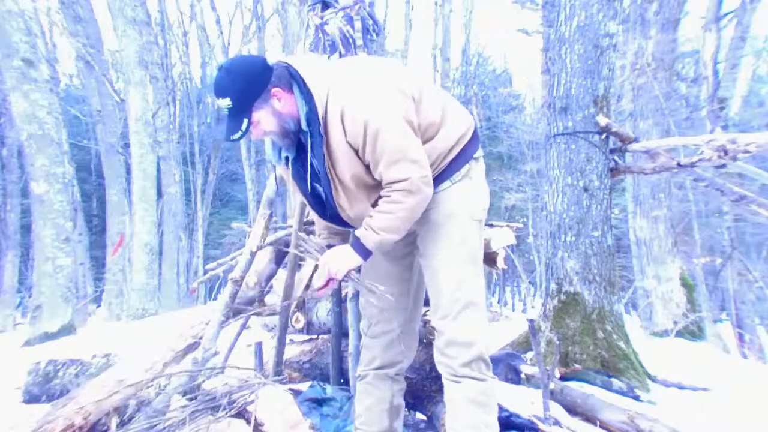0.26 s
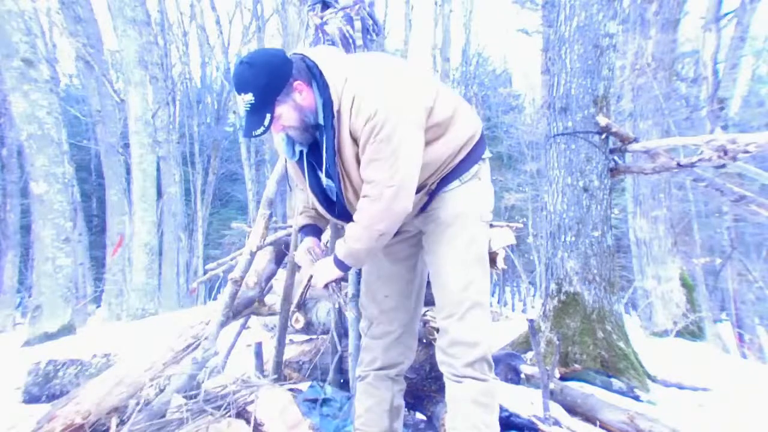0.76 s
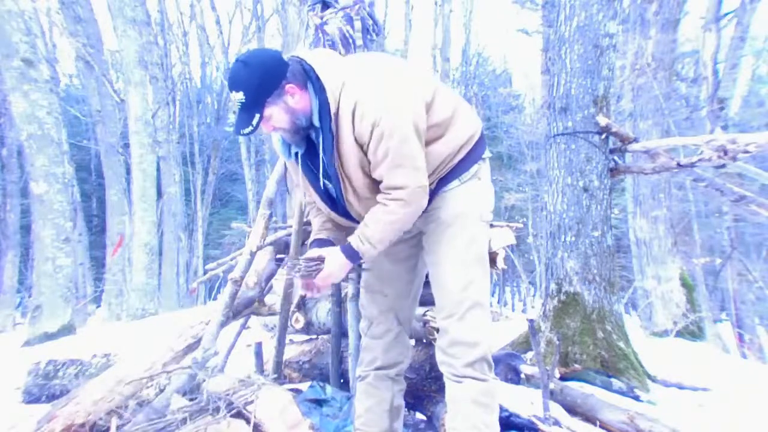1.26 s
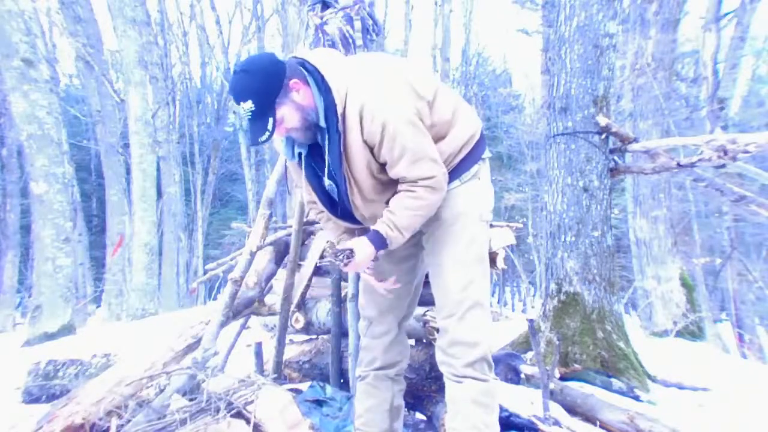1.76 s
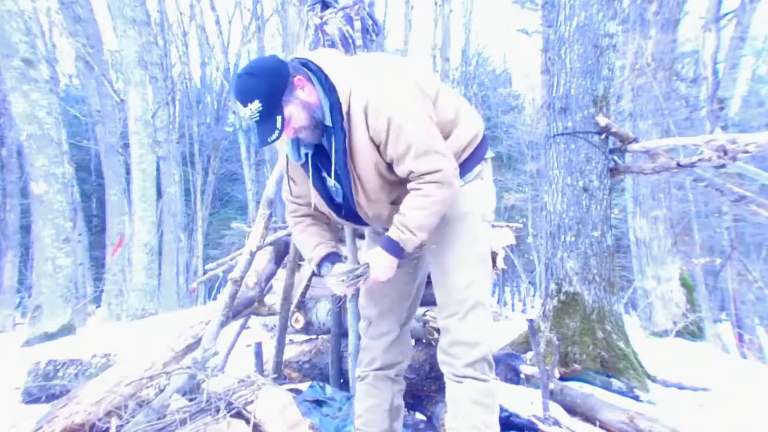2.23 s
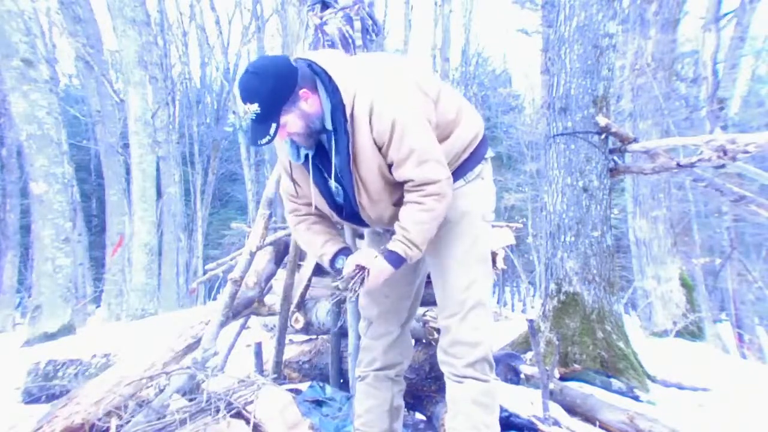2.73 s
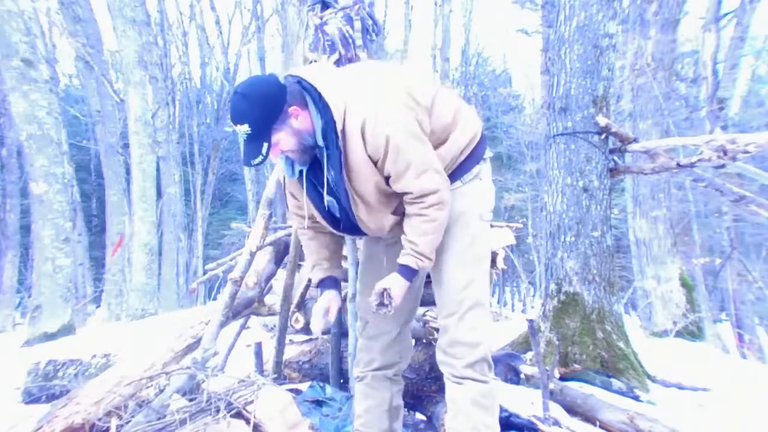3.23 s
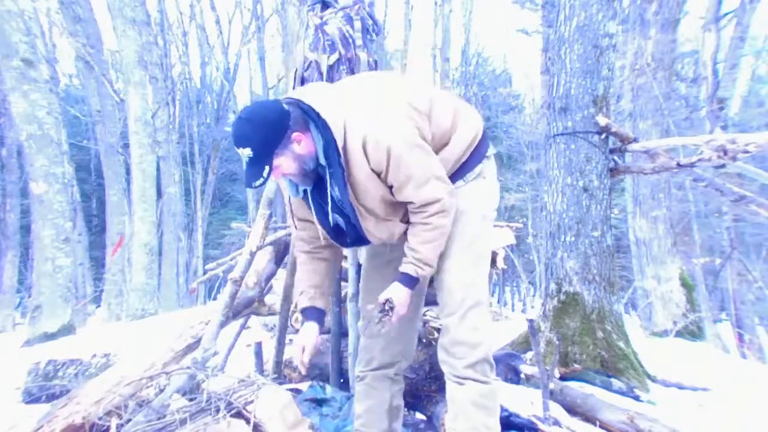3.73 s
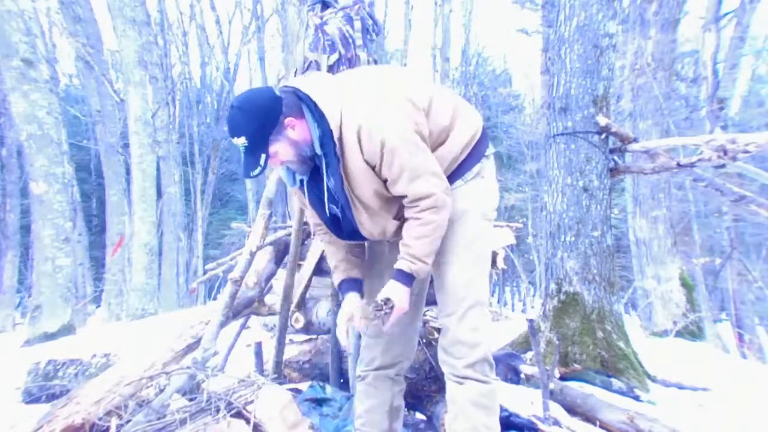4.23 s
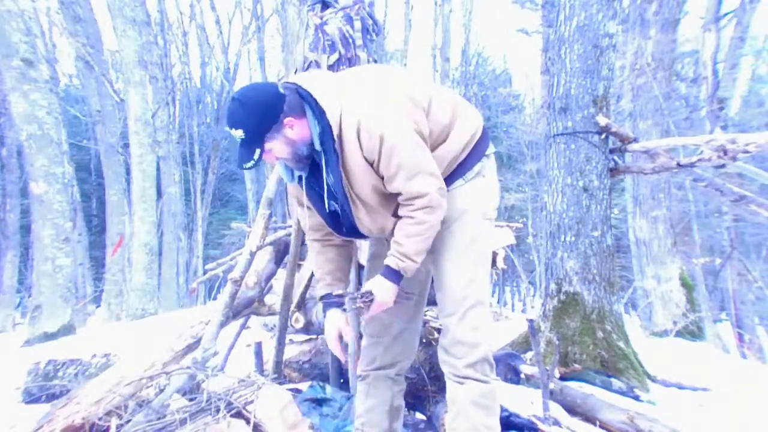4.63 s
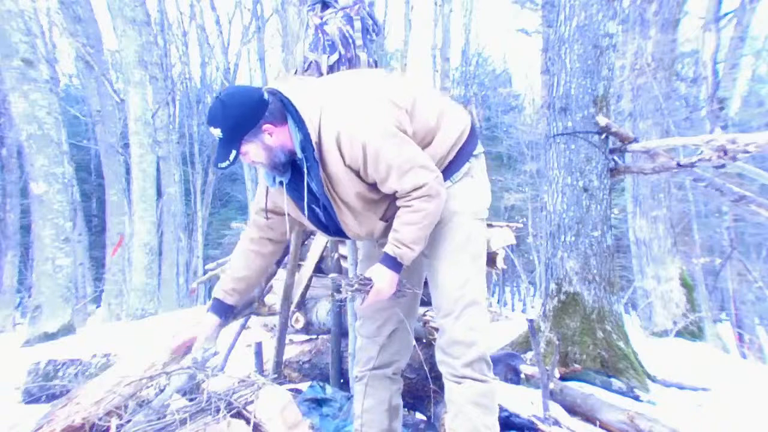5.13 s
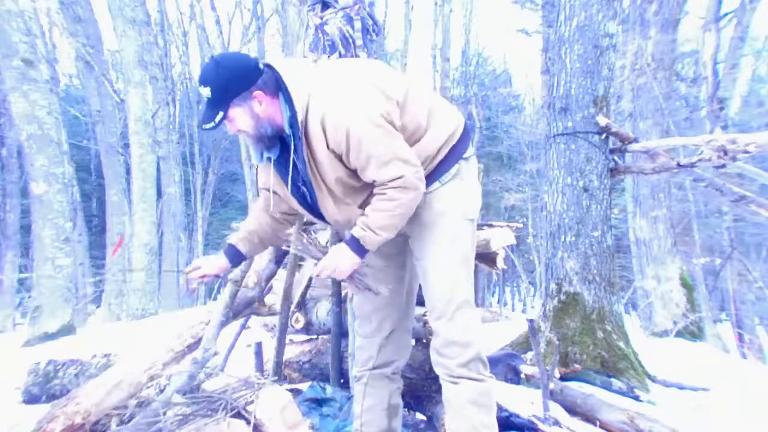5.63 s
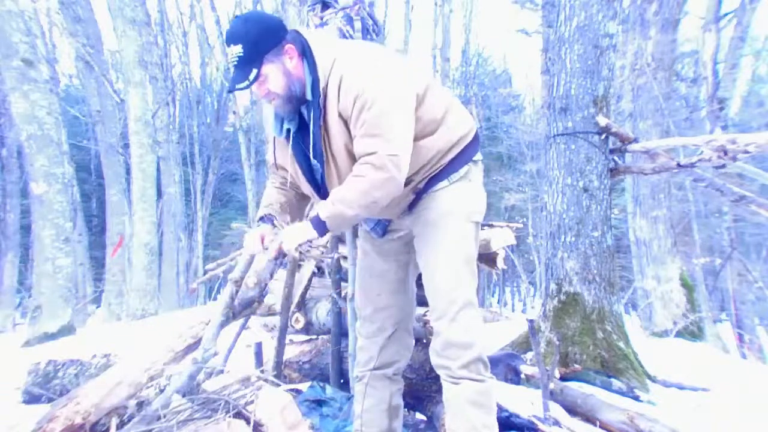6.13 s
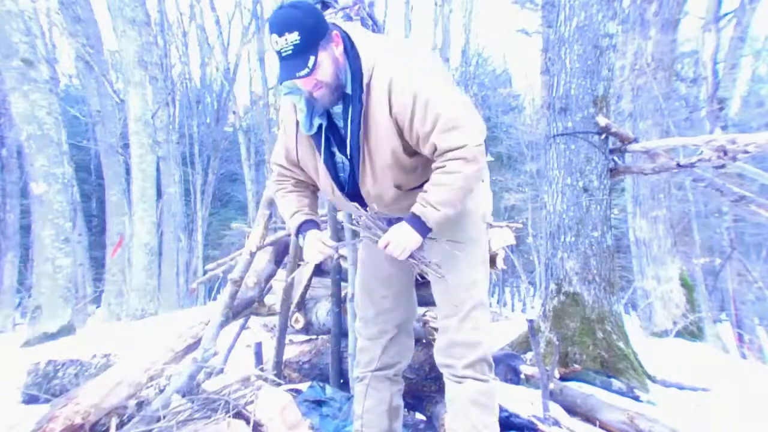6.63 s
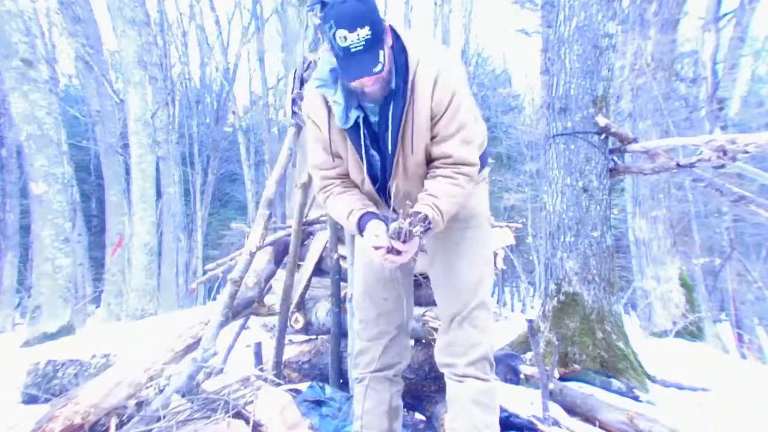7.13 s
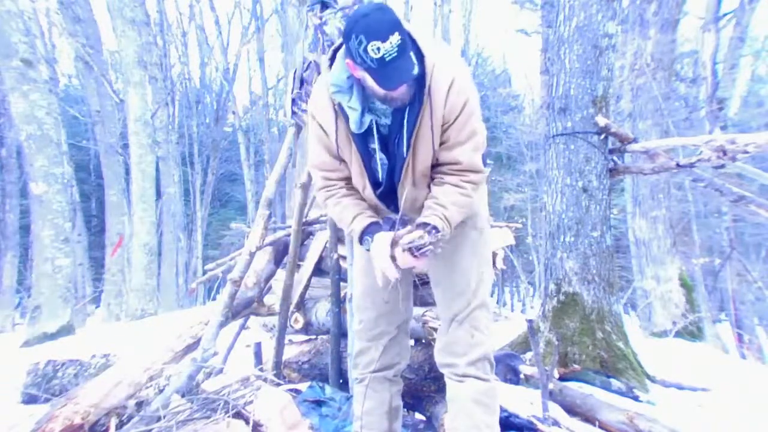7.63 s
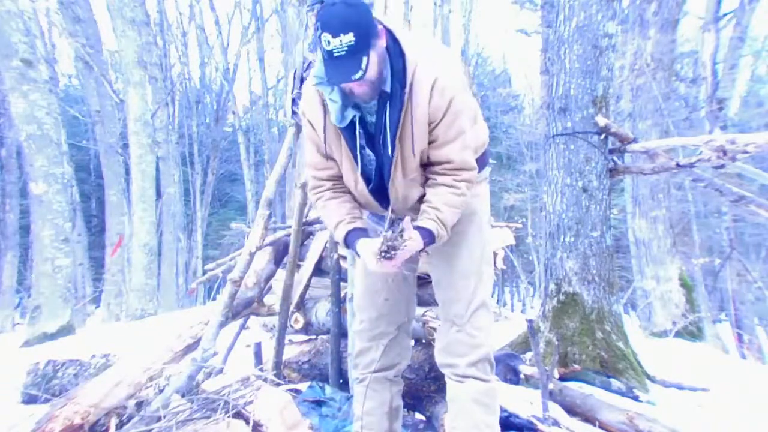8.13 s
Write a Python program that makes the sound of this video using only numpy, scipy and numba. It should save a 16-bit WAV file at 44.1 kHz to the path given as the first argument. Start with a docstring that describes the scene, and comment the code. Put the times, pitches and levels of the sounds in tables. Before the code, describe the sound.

A thin stick cracks at once amid brisk, dry rustling, then small twigs scrape and tick. Around 1.0 to 1.2 s a tight cluster of loud, brittle snaps breaks out, with splintering tails; lighter ticks follow, and a second, denser volley comes at 2.0 to 2.3 s. Rustling and small cracks thin out until 3 s. From 3 to 5.3 s it is nearly still, only faint knocks and ticks over soft air, hiss and a very high thin whine. Scraping returns about 5.3 s, and from 6.5 to 6.8 s rapid snaps peak in the hardest crack, overloading slightly so the level dips briefly. The bundle keeps rustling with fuller, woodier clicks, a strong snap at 7.9 s, and a swelling crunchy rustle at the end, 8.3 s. Bright, dry outdoor sound with a short diffuse scatter from trees, left channel only, right silent.

```python
"""Thin dry sticks are snapped and gathered by hand in a still, snowy wood, a few metres from a camera.
Breaks are bursts of tiny fibre cracks that ring, knock and splinter; twigs scrape and tick in the bundle.
Trunks and ground scatter the sticks back over a faint wash of air, amplifier hiss and a high whine.
The one microphone peaks near 7 kHz and feeds the left track only; it overloads, and its gain control ducks."""
import sys
import numpy as np
from scipy import signal
from scipy.fft import rfft, irfft
from scipy.io import wavfile
from scipy.ndimage import uniform_filter1d
from numba import njit

SR = 44100
rng = np.random.default_rng(int(sys.argv[2]) if len(sys.argv) > 2 else 0)


def log_audio(samples):
    """Write samples as a 16-bit WAV file to the path given in sys.argv[1]."""
    # one column per channel
    frames = np.atleast_2d(samples).T
    # limit to full scale, then quantise
    limited = np.clip(frames, -1, 1)
    pcm = np.round(limited * 32767).astype(np.int16)
    wavfile.write(sys.argv[1], SR, pcm)


N = 369237  # samples

# All levels are ahead of the input gain; all but the hiss and whine are also ahead of the microphone. # How
# hard the hands work the bundle: # (time [s], rustle level [dB], thick sticks over twigs [dB], fine twigs over
# twigs [dB])
HANDLING = [(0, -33.5, -7, -3), (.05, -39.5, -16, -13), (.29, -40, -16, -20), (.33, -43.5, -16, -11),
            (.39, -40.5, -13, -9), (.45, -49, -9.5, -9), (.52, -41.5, -14, -6), (.57, -52, -8, -13),
            (.65, -38, -10.5, -11), (.86, -41, -11.5, -6), (1.03, -43.5, -11, -3.5), (1.3, -42.5, -4, -10),
            (1.37, -48, -3.5, -9), (1.44, -43, -8, -8), (1.52, -50.5, -4, -10), (1.69, -46, -5, -5),
            (1.79, -38, -8, -8), (1.84, -55.5, -3.5, -7), (2.0, -43.5, -7.5, -5), (2.4, -50.5, -10, -10),
            (2.45, -43, -11, -6), (2.62, -41, -6, -7), (2.71, -52, -6.5, -3), (2.86, -42.5, -15, -7.5),
            (2.92, -57.5, -13, -6), (3.2, -55.5, -4, -3), (3.26, -61.5, -5, -4), (3.55, -56.5, -3, -7),
            (3.64, -47.5, -8.5, -10), (3.71, -63, 1, -4), (3.8, -55, -11, -13), (3.93, -62, -2, -8),
            (3.97, -49, -3.5, -6), (4.15, -47, -11, -8), (4.22, -64, -1.5, -11), (4.42, -54.5, 2.5, -16),
            (4.5, -63.5, 0, -5), (5.3, -64, -3, -8), (5.33, -44, -10, -13), (5.51, -42, -13.5, -12),
            (5.61, -37.5, -15.5, -12), (5.68, -51.5, -6, -11), (5.88, -52, -9, -14), (6.0, -44, -7.5, -26),
            (6.11, -51, -10, -20), (6.14, -40, -11.5, -9.5), (6.43, -50.5, -5, -10), (6.52, -33, -7, -7),
            (6.61, -45, -8, -6), (6.69, -39.5, -9, -3.5), (6.77, -45.5, -8.5, -14),
            (6.83, -37.5, -8.5, -5.5), (7.0, -44, -5.5, -2.5), (7.07, -38.5, -4, -5.5),
            (7.37, -45, -2.5, -8), (7.44, -49.5, -2.5, -8), (7.59, -45.5, -3, -9.5),
            (7.84, -45.5, -0.5, -5), (7.93, -38, -0.5, -3.5), (8.0, -54, -5.5, -9), (8.15, -38, -1.5, -5),
            (8.26, -50, -1, -5), (8.37, -24, -7, -5)]
# Short rings of the twigs in the bundle:
# (centre [Hz], width of the first of two filters [Hz], level [dB], kind [0 thick stick, 1 twig, 2 fine twig])
TWIG_RINGS = [(1210, 940, -8, 0), (1976, 1100, -9, 0), (2840, 1260, -5.5, 0), (3460, 1900, -9.5, 1),
              (5030, 1300, -11, 1), (5910, 1040, -8.5, 1), (6600, 910, -11.5, 1), (7910, 1470, -11, 1),
              (9150, 1650, -6, 2), (10400, 3100, -2.5, 2), (14800, 3800, -6, 2)]
# Breaks and clear ticks:
# (time [s], crack level [dB], crack T60 [s], knock [Hz], knock over crack [dB], treble over crack [dB])
BREAKS = [(0.012, -20, 0.032, 3330, -13, -19), (.0649, -30.5, 0.02, 2920, -1, -20),
          (.0753, -27.5, 0.022, 3100, -8, -20), (.1347, -38, .014, 2510, -30, -15),
          (0.254, -35.5, 0.12, 2840, -6, -19), (.4789, -36, 0.021, 2820, -21, -10),
          (0.5307, -30.5, 0.022, 1260, -19, 1), (.5632, -42.5, 0.029, 1960, 11.5, -17),
          (0.5833, -37.5, 0.018, 2470, 5.5, -12), (.6137, -28.5, 0.029, 2200, -19, -13),
          (0.646, -32.5, 0.042, 2930, -11, 2), (0.7317, -31.5, 0.021, 2560, -22, -17),
          (0.8166, -24.5, 0.021, 2720, -20, -4), (0.8476, -31, 0.012, 2870, 0, 12.5),
          (0.86, -27, 0.036, 2610, -14, -17), (.878, -39.5, 0.014, 1960, 5, -9),
          (0.95, -34.5, 0.012, 2820, 2, 8), (1.0242, -37, .01, 2180, -18, 9),
          (1.0416, -16, 0.034, 2220, -13, 2), (1.0725, -10.5, 0.05, 2280, -17, 5.5),
          (1.077, -5.5, .018, 3020, -14, -14), (1.1103, -26.5, .015, 1170, -6, -7),
          (1.1604, -11, 0.011, 1880, -11.5, -26), (1.189, -27, 0.015, 1670, -7, -13),
          (1.199, -18, 0.0067, 2040, -13, -10), (1.2155, -38, .012, 2350, 6, -8),
          (1.287, -31.5, 0.015, 3050, -2, -10), (1.4143, -36, 0.038, 3100, -2, -8),
          (1.4403, -23.5, .01, 1740, -16, -33), (1.5644, -28.5, 0.015, 2150, -8, -21),
          (1.612, -18.5, 0.021, 2530, -8, -9), (1.752, -18, 0.013, 2090, -18, -10),
          (1.787, -23.5, .018, 2240, -30, -15), (1.7923, -31, 0.026, 1470, 3.5, -9),
          (1.8154, -36, .022, 1780, -20, -8), (1.857, -29.5, 0.011, 2290, -26, -7),
          (1.9366, -38.5, 0.036, 3160, -9, 8), (1.973, -35, .015, 2120, -12, -3),
          (2.0144, -17.5, 0.016, 2800, -7, 7.5), (2.0206, -17.5, 0.0093, 2540, -19, 2),
          (2.0339, -7, .008, 2230, -20, -27), (2.0453, -10.5, 0.012, 1960, -15, -0.5),
          (2.0984, -7.5, 0.04, 1920, -21, 2.5), (2.147, -6, 0.019, 2480, -12, 4),
          (2.1959, -21, .03, 2380, -13, 6), (2.214, -11, 0.009, 2780, -32, -35),
          (2.223, -13, 0.014, 3000, -35, -17), (2.274, -28.5, .029, 3010, -30, -7),
          (2.4346, -30, 0.017, 2890, -23, -1), (2.4532, -33, 0.016, 3060, -23, 6),
          (2.4826, -29, 0.018, 2860, -13, -15), (2.5203, -28, 0.014, 2560, -26, -11),
          (2.534, -28.5, 0.0059, 2330, -8, -8), (2.6066, -22, 0.0088, 2380, 2, -14),
          (2.6157, -30, .022, 3070, -20, 13), (2.675, -34.5, 0.035, 1330, -12, 2),
          (2.707, -29.5, 0.017, 2280, -17, -22), (2.733, -27, .016, 2190, -23, -19),
          (2.803, -35, 0.015, 2330, -17, -18), (2.8437, -34.5, .02, 2840, -20, -14),
          (2.967, -44, .015, 1590, -4, -3), (3.0246, -33, 0.03, 2210, -18, -22),
          (3.084, -37, 0.029, 2410, -21, -9), (3.0937, -40, 0.038, 2410, -12, 1),
          (3.1527, -33, 0.0071, 1760, -23, -9), (3.213, -42, 0.027, 2610, 6, -14),
          (3.258, -47, .03, 2580, -18, 3), (3.5872, -40.5, 0.037, 1460, -12, -16),
          (3.646, -39, 0.045, 2120, -26, -13), (3.79, -39.5, .027, 2420, -25, -11),
          (3.8185, -31.5, 0.015, 2100, -0.5, -16), (3.8375, -48, .018, 3020, -6, 8),
          (3.953, -42, 0.027, 1340, -12, -8), (3.971, -36.5, 0.03, 2840, 5.5, -6),
          (4.0118, -33.5, .013, 2720, -7, -11), (4.0883, -31, 0.017, 3040, -13, -18),
          (4.1187, -46, 0.013, 2350, 3.5, -11), (4.1448, -40.5, 0.048, 2500, -6, 5),
          (4.2, -35.5, 0.015, 2400, -10, -16), (4.6522, -37.5, 0.025, 1900, 11.5, -2),
          (4.6728, -49.5, 0.041, 2460, 10, -8), (5.383, -38, 0.023, 2730, -27, -4),
          (5.5388, -37, .03, 3180, 0.5, -25), (5.6, -40, .033, 3200, -26, -15),
          (5.7112, -43, .06, 2070, -2.5, 1), (5.7809, -30.5, 0.04, 2130, -20, -17),
          (5.8843, -38, 0.062, 2820, -7, -21), (5.9107, -25, 0.033, 3260, -35, -23),
          (5.948, -32.5, 0.038, 2180, -34, -24), (6.0147, -32, 0.047, 3300, -3, -19),
          (6.0583, -38.5, 0.039, 2920, -4, -20), (6.1271, -32.5, 0.0099, 3080, -1, -22),
          (6.195, -30, .0061, 2730, -11, -21), (6.228, -30.5, 0.025, 1730, -26, -1),
          (6.2843, -35, .0054, 1380, -20, -9), (6.391, -35.5, 0.026, 1590, -0.5, -13),
          (6.4511, -23, 0.013, 2500, -13, 8.5), (6.5097, -29, 0.05, 2880, -7, -13),
          (6.5533, -28, 0.011, 2020, -24, -20), (6.5628, -19, 0.017, 2250, -14, 7),
          (6.578, -30, .023, 2700, -26, -12), (6.5978, -16.5, 0.014, 2980, -17, 5),
          (6.628, -14.5, 0.03, 2650, -12, -8), (6.65, -14, 0.0085, 1670, -12, 8),
          (6.6602, -9, 0.033, 2400, -10, 6.5), (6.6786, -25, .028, 2800, -12, 2),
          (6.6897, -25, 0.0097, 1720, -11, 8), (6.7148, -32.5, 0.043, 1990, -8, -5),
          (6.744, -30, 0.012, 1480, -11, -3), (6.7815, 0, 0.029, 2270, -14, -4),
          (6.7895, -16.5, 0.016, 3450, 1, -7), (6.8452, -21, 0.0068, 2180, -4, 5.5),
          (6.948, -19, 0.0079, 1420, -12.5, -30), (7.042, -16, 0.032, 2470, -16, -11),
          (7.0668, -19.5, 0.018, 1380, -11, -7), (7.1327, -34, .029, 2670, -1, -14),
          (7.358, -28.5, 0.013, 2190, -10, 9), (7.534, -35.5, .024, 2400, -15, 7),
          (7.815, -26.5, 0.0095, 2000, -18, -5), (7.853, -24, 0.033, 2920, -3.5, -14),
          (7.903, -11, 0.034, 1600, -9.5, 4.5), (7.921, -24, 0.019, 1850, -8, -1),
          (7.9544, -28, 0.014, 2500, -13, -11), (8.098, -29.5, .01, 2630, -19, -1),
          (8.1836, -26, 0.017, 2230, -13, -13), (8.3187, -17, 0.011, 2760, -4, 8),
          (8.3455, -25, 0.015, 1640, -16, -8), (8.361, -21, 0.007, 2640, 5, -18)]
# Spectrum of the still air in the wood: (frequency [Hz], relative density [dB per Hz])
AIR_SPECTRUM = [(40, -14), (250, -14), (550, 4.5), (1000, 3.5), (2500, 0), (7000, -14), (12000, -12)]
# Spectrum of the amplifier hiss: (frequency [Hz], relative density [dB per Hz])
HISS_SPECTRUM = [(40, -16), (400, -4.5), (3000, 2), (12000, 0.5), (15000, 3), (15700, -3), (15900, -43)]
# Whine of the camera's scan circuits: (mean frequency [Hz], level [dB rms])
WHINE_TONES = [(15407, -79), (15466, -80), (15525, -82), (15585, -68), (15644, -67.5), (15703, -71)]
# A faint airy band drifting in and out: (time [s], level [dB])
BREEZE_LEVEL = [(4.2, -80), (4.4, -61.5), (5.9, -65.5), (6.3, -86)]
# Response of the microphone in its housing: (frequency [Hz], gain [dB])
MIC_RESPONSE = [(40, 2), (200, 4.5), (500, -4), (3000, -2), (4500, 3), (6200, 3), (7100, 6), (7600, 4.5),
                (7900, -5), (8300, 2), (11000, -3.5), (15600, -5.5), (16100, -30.5)]

AIR_DB, HISS_DB = -59, -58.5
CRACK_HZ, CRACK_SPREAD_HZ = 6553, 378
SPLINTERS_T60_S, SPLINTERS_DB = 0.045, -18
SHAKE_DB, SHAKE_T60_S = -23.5, 0.15  # rustle set off by a break, relative to its crack
TICKS_PER_S, TICK_DB, TICK_SCATTER_DB = 26, 1.5, 3  # mean rate, level over the rustle, spread
TICK_T60_S, TICK_KNOCK_HZ = 0.015, 2340  # medians
TICK_KNOCK_DB, TICK_TOP_DB = -12, -12  # means, over the crack
SCATTER_T60_S, SCATTER_DB = 0.099, -17
BREEZE_HZ, BREEZE_WIDTH_HZ = 1490, 330  # width of the first of two filters
INPUT_DB, OVERLOAD = 6.5, 0.75  # input gain, level that triggers the ducking [full scale 1]
DUCK_DB, HOLD_S, ATTACK_S, RECOVER_S = -5, 1.36, 0.04, 0.18
TOP_HZ = 16376


def undb(db):
    """Decibels to amplitude."""
    return 10 ** (np.asarray(db) / 20)


def unit(x):
    """Scale to an rms of 1."""
    return x / np.sqrt(np.mean(x ** 2))


def band(x, hz, width_hz):
    """One resonance, gain 1 at the centre."""
    return signal.lfilter(*signal.iirpeak(hz, hz / width_hz, fs=SR), x)


def colour(x, shape, size=2048):
    """Causal filter through (Hz, dB) points, built from the folded cepstrum of the log gain."""
    hz, db = np.transpose(shape)
    grid = np.maximum(np.arange(size // 2 + 1) * SR / size, 1)
    gain_db = np.interp(np.log(grid), np.log(hz), db)
    cepstrum = irfft(np.log(undb(gain_db)))
    cepstrum[1:size // 2] *= 2
    cepstrum[size // 2 + 1:] = 0
    response = irfft(np.exp(rfft(cepstrum)))
    return signal.fftconvolve(x, response)[:len(x)]


def walk(rate):
    """Random levels drawn `rate` times a second and slewed from one to the next; rms 1."""
    step = int(SR / rate)
    held = np.repeat(rng.standard_normal(N // step + 1), step)
    return unit(uniform_filter1d(held, step)[:N])


def fibres(shape, rate, scatter_db):
    """Tiny cracks at random moments, `rate` a second, a few far stronger than the rest."""
    when = rng.random(shape) < rate / SR
    strength = undb(scatter_db * rng.exponential(size=shape))
    return when * rng.standard_normal(shape) * strength


def handling():
    """Rustle level and the shares of thick sticks and fine twigs, dB at every sample."""
    s, *controls = np.transpose(HANDLING)
    return [np.interp(np.arange(N) / SR, s, control) for control in controls]


def shake():
    """Every break kicks the bundle into rustling, and it settles again exponentially."""
    breaks = np.array(BREAKS)
    kicks = np.zeros(N)
    np.add.at(kicks, (breaks[:, 0] * SR).astype(int), undb(breaks[:, 1] + SHAKE_DB))
    return signal.lfilter([1], [1, -np.exp(-np.log(1000) / (SHAKE_T60_S * SR))], kicks)


def rustle():
    """Bark scrapes on bark in quick uneven slips; every twig rings briefly and slips partly on its own."""
    level, thick, fine = undb(handling())
    level = level + shake()
    # a slip starts at once and decays with a time constant of 8.4 ms
    slip_starts = np.abs(fibres(N, rate=130, scatter_db=1.0))
    slips = signal.lfilter([1], [1, -np.exp(-1 / (0.0084 * SR))], slip_starts)
    unevenness = undb(1.4 * walk(60) + 1.35 * walk(250))
    jolts = unit((1.74 + unit(slips)) * unevenness)
    together = unit(fibres(N, rate=2100, scatter_db=0.5))
    rings = 0
    for hz, width_hz, ring_db, kind in TWIG_RINGS:
        alone = unit(fibres(N, rate=4000, scatter_db=2.0) * undb(2.56 * walk(110)))
        scrape = alone + 0.47 * together
        ring = unit(band(band(scrape, hz, width_hz), hz, 2.5 * width_hz))
        share = (thick, 1, fine)[int(round(kind))]
        rings = rings + undb(ring_db) * share * ring
    return level * jolts * rings


def air():
    """Faint steady wash of the wood: coloured noise with a slight, slow drift in level."""
    wash = unit(colour(rng.standard_normal(N), AIR_SPECTRUM))
    return undb(AIR_DB + 0.12 * walk(2.38)) * wash


def electronics():
    """Amplifier hiss and a cluster of thin, slightly wavering sines just under 16 kHz."""
    whine = np.zeros(N)
    for hz, db in WHINE_TONES:
        turns = np.cumsum(hz + 6.7 * walk(25)) / SR + rng.random()
        whine += np.sqrt(2) * undb(db) * np.sin(2 * np.pi * turns)
    hiss = unit(colour(rng.standard_normal(N), HISS_SPECTRUM))
    return undb(HISS_DB) * hiss + whine


def wood(x, crack_hz, knock_hz):
    """Three ways in which dry wood answers a crack: brittle ring, hollow knock, splintering top."""
    brittle = unit(band(x, crack_hz, 850))
    broad = unit(band(band(x, 5300, 7300), 5300, 7300))
    hollow = unit(band(band(x, knock_hz, 0.36 * knock_hz), knock_hz, 2.1 * knock_hz))
    body = unit(band(band(x, 1840, 3900), 1670, 5200))
    top = band(band(x, 9800, 10400), 9800, 10400)
    return unit(brittle + 0.89 * broad), unit(hollow + 0.35 * body), unit(top)


def snaps(rows, size=3072):
    """Each break is a burst of parting fibres that dies out fast; loose splinters keep ticking after it."""
    out, t = np.zeros(N + size), np.arange(size) / SR
    cracks_hz = CRACK_HZ + CRACK_SPREAD_HZ * rng.standard_normal(len(rows))
    bursts = fibres((len(rows), size), rate=16000, scatter_db=1.0)
    bursts *= 1 + np.exp(-t / 0.00038)  # the first fibres to give are the most strained
    loose = fibres((len(rows), size), rate=2700, scatter_db=4.0)
    splinter_fall = np.exp(-np.log(1000) * t / SPLINTERS_T60_S)
    for burst, bits, crack_hz, row in zip(bursts, loose, cracks_hz, rows):
        s, db, t60, knock_hz, knock_db, top_db = row
        crack, knock, top = wood(burst, crack_hz, knock_hz)
        # the knock lingers longer than the crack, the treble goes sooner
        fall = np.log(1000) * t / max(t60, 0.004)
        sound = crack * np.exp(-fall)
        sound += undb(knock_db) * knock * np.exp(-0.8 * fall)
        sound += undb(top_db) * top * np.exp(-1.2 * fall)
        splinters = unit(band(bits, crack_hz, 3200)) * splinter_fall
        # a slow tear also starts more softly than a clean break
        start = np.minimum(t / (0.046 * t60), 1)
        i = int(s * SR)
        out[i:i + size] += undb(db) * start * (sound + undb(SPLINTERS_DB) * splinters)
    return out[:N]


def small_ticks():
    """Twigs tick at random moments, around the handling level; rows like those of the breaks."""
    s = np.sort(rng.random(300)) * (N - 1) / SR
    keep = rng.random(len(s)) < TICKS_PER_S * N / SR / len(s)
    vary = rng.standard_normal((len(s), 5))
    rustle_db = handling()[0][(s * SR).astype(int)]
    rows = [s,
            rustle_db + TICK_DB + TICK_SCATTER_DB * vary[:, 0],
            TICK_T60_S * np.exp(0.6 * vary[:, 1]),
            TICK_KNOCK_HZ * np.exp(0.34 * vary[:, 2]),
            TICK_KNOCK_DB + 3.1 * vary[:, 3],
            TICK_TOP_DB + 4.0 * vary[:, 4]]
    return np.transpose(rows)[keep]


def scatter(x):
    """Ground and trunks send back a short diffuse tail: decaying noise with a soft 3.9 ms onset."""
    t = np.arange(SR // 4) / SR
    fall = np.exp(-np.log(1000) * t / SCATTER_T60_S)
    tail = rng.standard_normal(len(t)) * fall * np.minimum(t / 0.0039, 1)
    tail /= np.sqrt(np.sum(tail ** 2))
    return undb(SCATTER_DB) * signal.fftconvolve(x, tail)[:N]


def breeze():
    """A narrow wash of air, barely above the floor: band-passed noise with a restless level."""
    s, db = np.transpose(BREEZE_LEVEL)
    narrow = band(rng.standard_normal(N), BREEZE_HZ, BREEZE_WIDTH_HZ)
    wash = unit(band(narrow, BREEZE_HZ, 2 * BREEZE_WIDTH_HZ))
    level_db = np.interp(np.arange(N) / SR, s, db) + 0.78 * walk(13)
    return undb(level_db) * wash


def scene():
    """Sticks, their scatter and the air at the microphone; the second channel is silent."""
    sticks = rustle() + snaps(BREAKS) + snaps(small_ticks(), size=2048)
    return np.array([sticks + scatter(sticks) + air() + breeze(), np.zeros(N)])


@njit
def duck(x, overload, hold, attack, recover):
    """Share 0-1 of the gain cut: rises after an overload, is held, then lets go; times in samples."""
    cut, share, timer = np.empty(len(x)), 0., 0.
    for i in range(len(x)):
        timer = hold if abs(x[i]) > overload else timer - 1
        share += (1 - share) / attack if timer > 0 else -share / recover
        cut[i] = share
    return cut


def record(dry):
    """Housing colour, hiss, gain control, a lopsided overload that thumps, and the top cut; right is blank."""
    x = undb(INPUT_DB) * (colour(dry[0], MIC_RESPONSE) + electronics())
    cut = duck(x, 1. * OVERLOAD, HOLD_S * SR, ATTACK_S * SR, RECOVER_S * SR)
    x = x * undb(DUCK_DB * cut)
    x = np.clip(x, -0.86, 0.86)
    # the squared signal makes the overload lopsided; its part above 150 Hz is the thump
    thump = signal.lfilter(*signal.butter(2, 150, "high", fs=SR), x ** 2)
    x = x + 0.059 * thump
    x = signal.sosfilt(signal.ellip(10, 0.2, 80, TOP_HZ, fs=SR, output="sos"), x)
    return np.array([x, np.zeros(N)])


dry = scene()
out = record(dry)
log_audio(out)
```